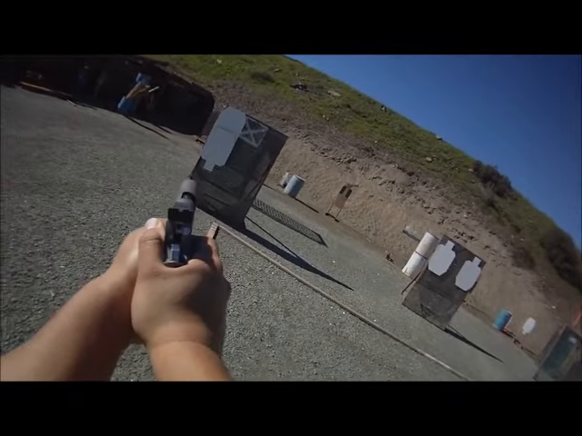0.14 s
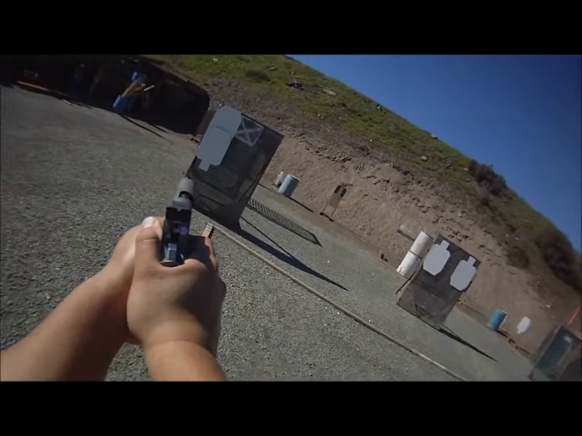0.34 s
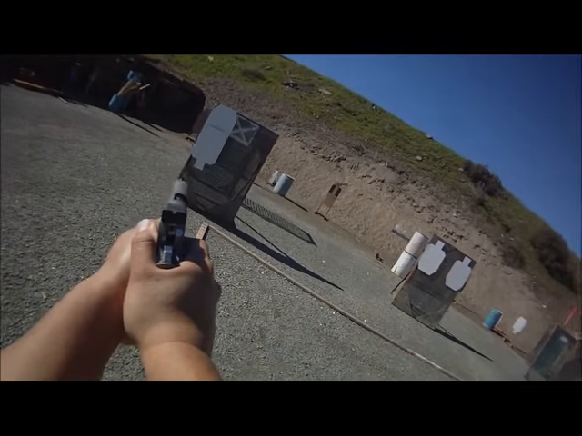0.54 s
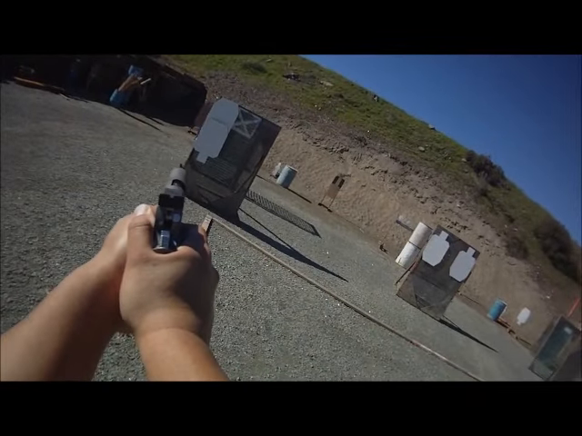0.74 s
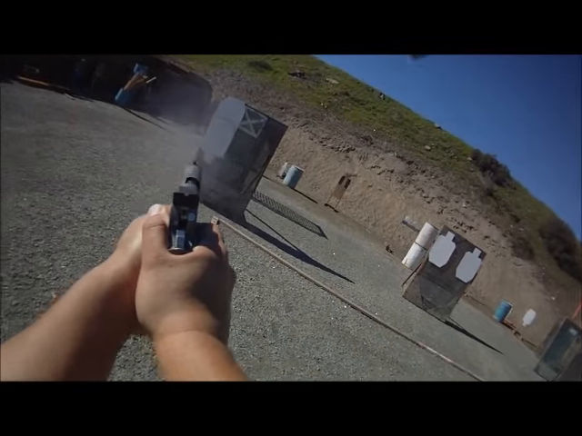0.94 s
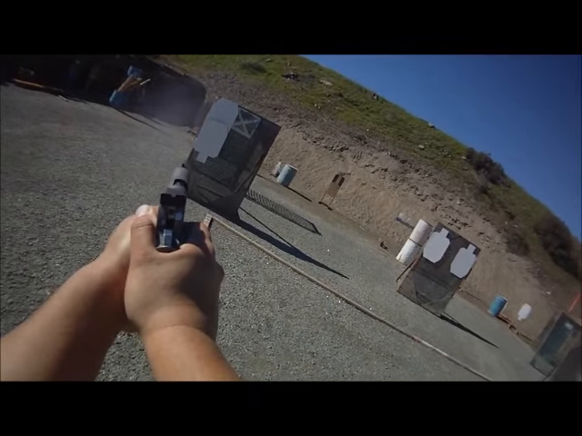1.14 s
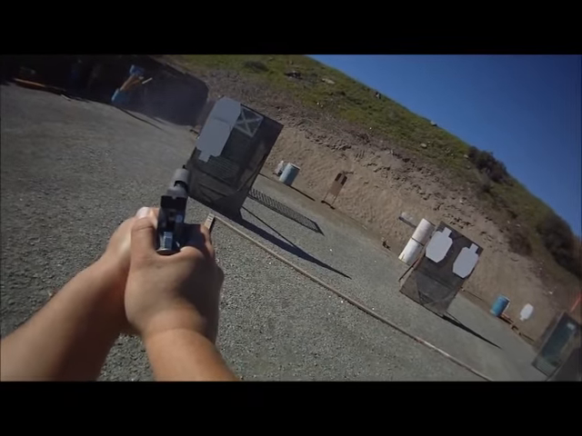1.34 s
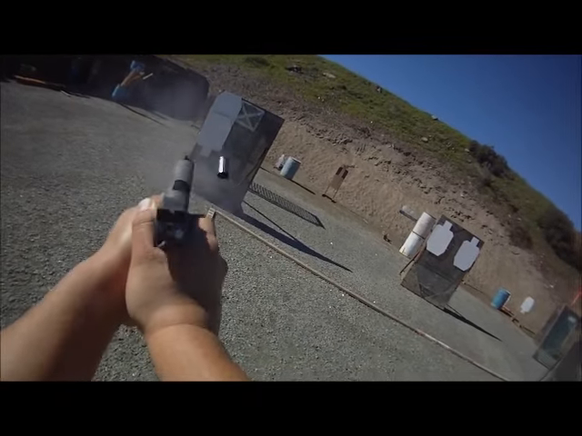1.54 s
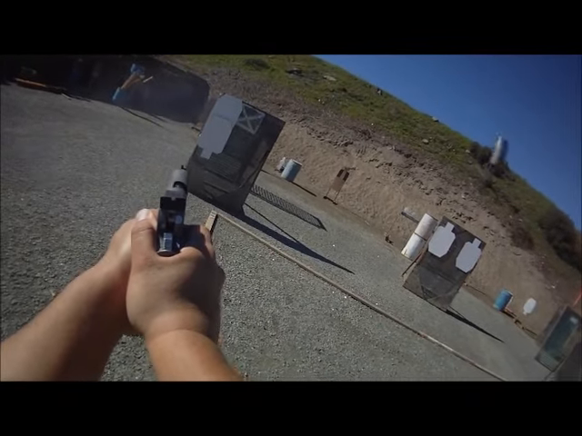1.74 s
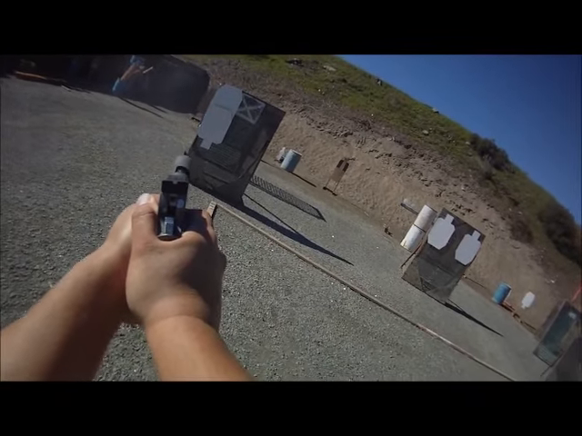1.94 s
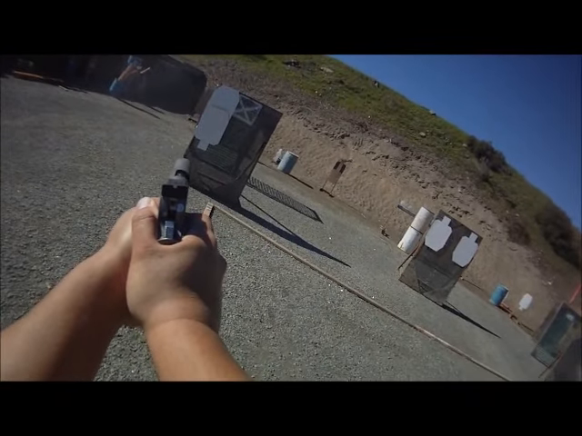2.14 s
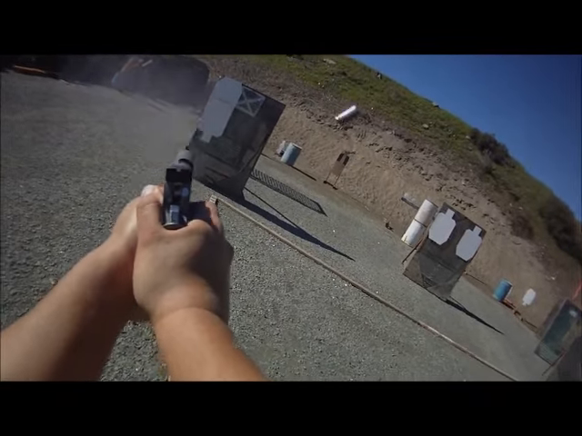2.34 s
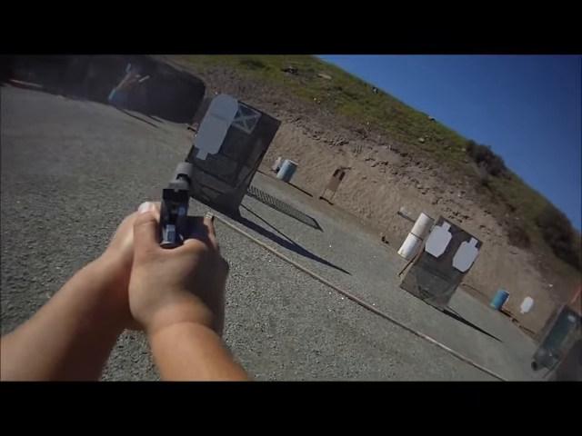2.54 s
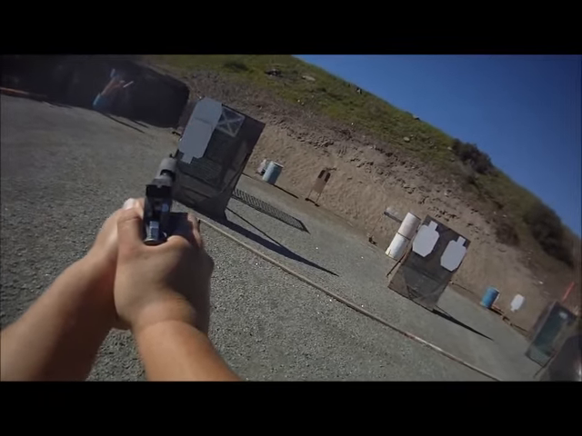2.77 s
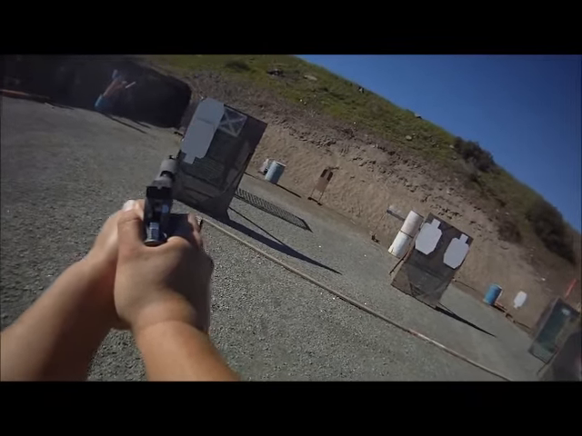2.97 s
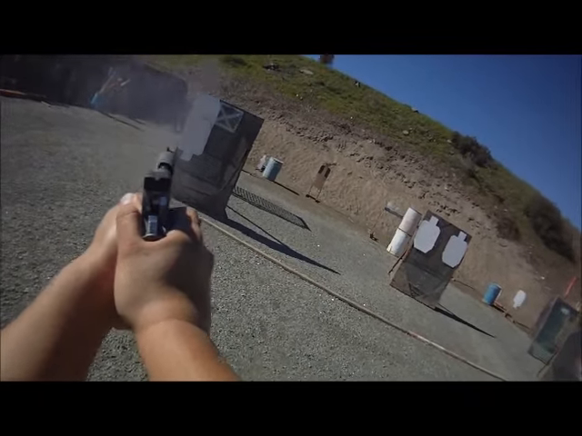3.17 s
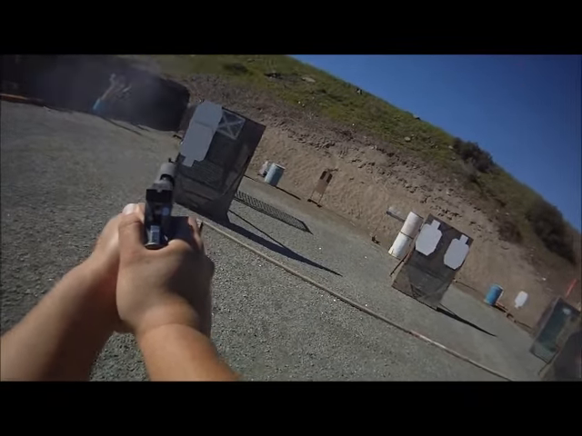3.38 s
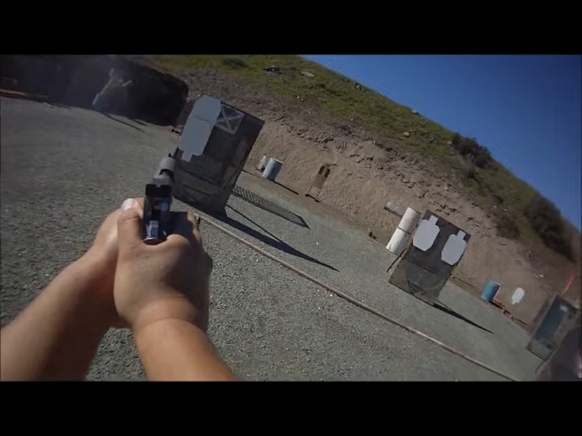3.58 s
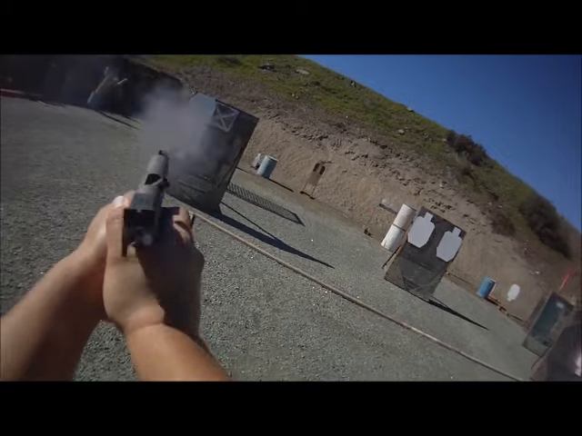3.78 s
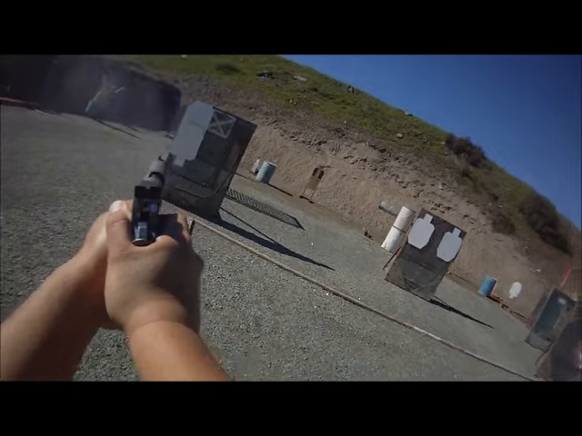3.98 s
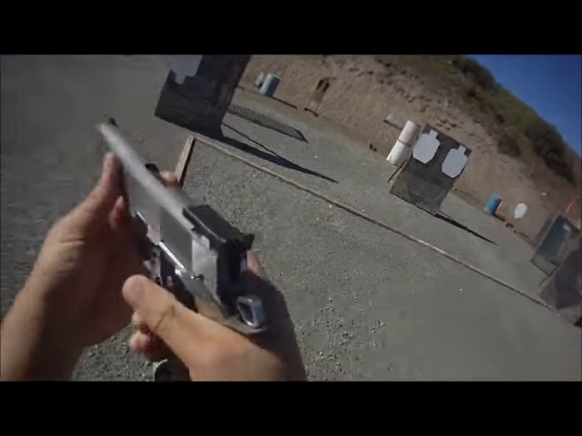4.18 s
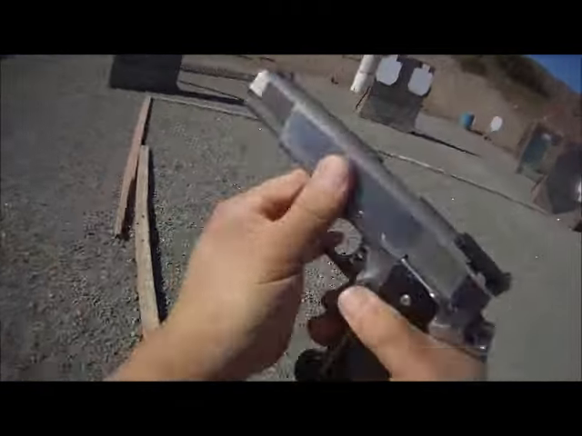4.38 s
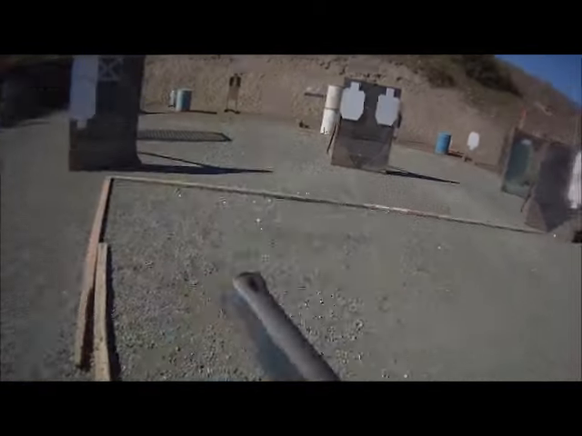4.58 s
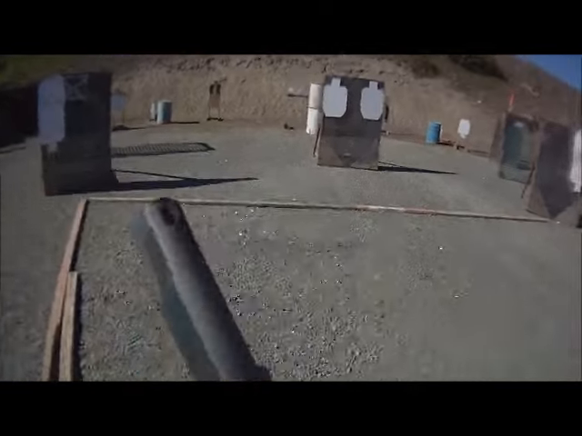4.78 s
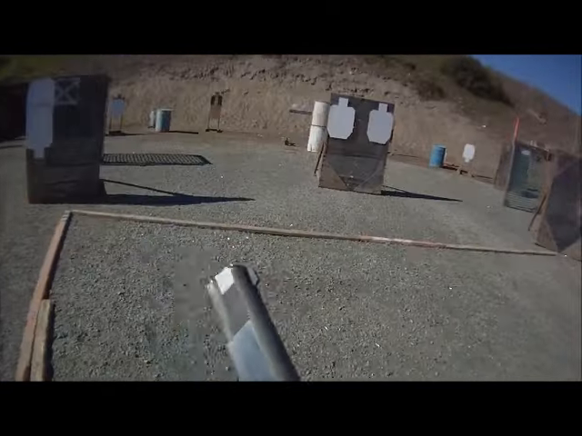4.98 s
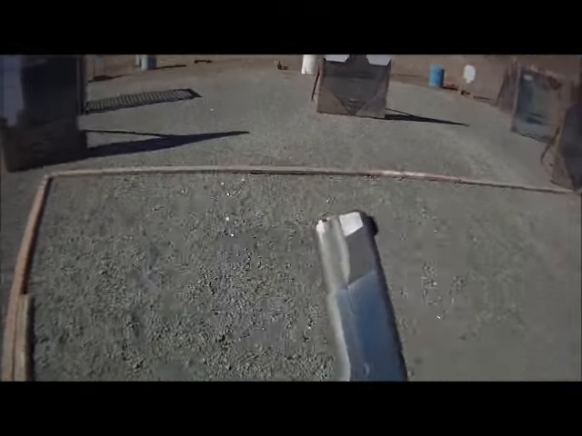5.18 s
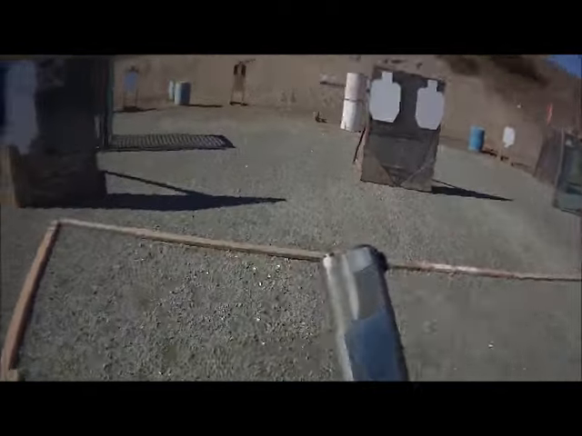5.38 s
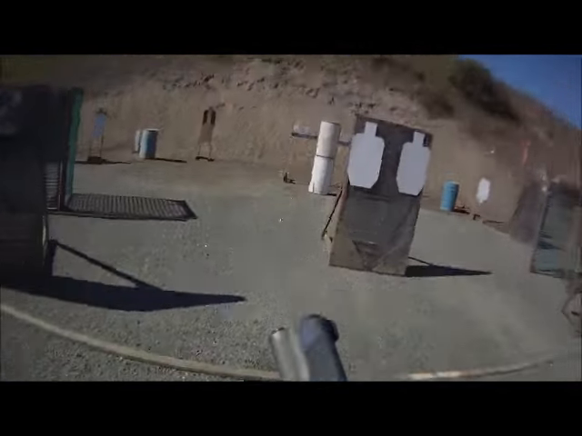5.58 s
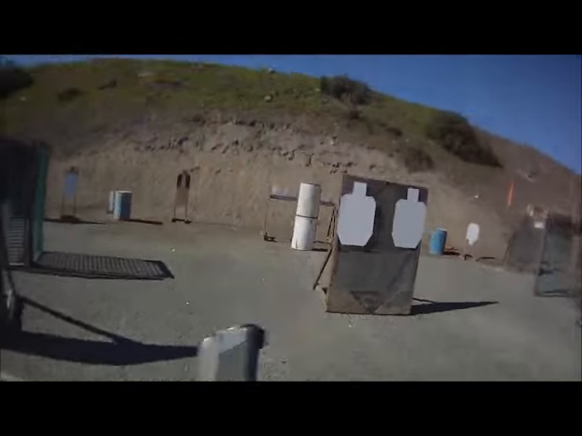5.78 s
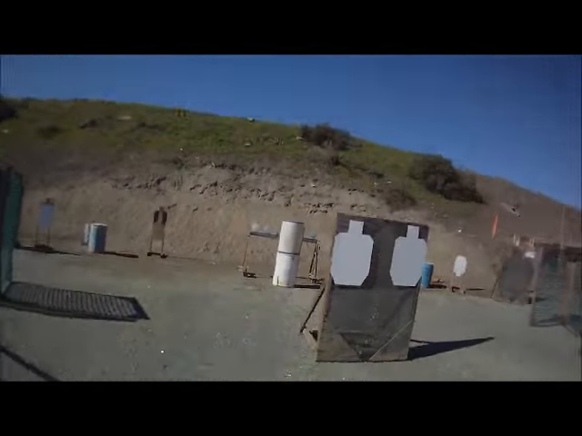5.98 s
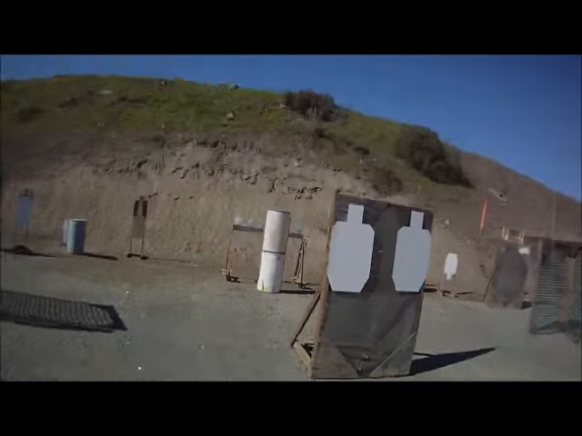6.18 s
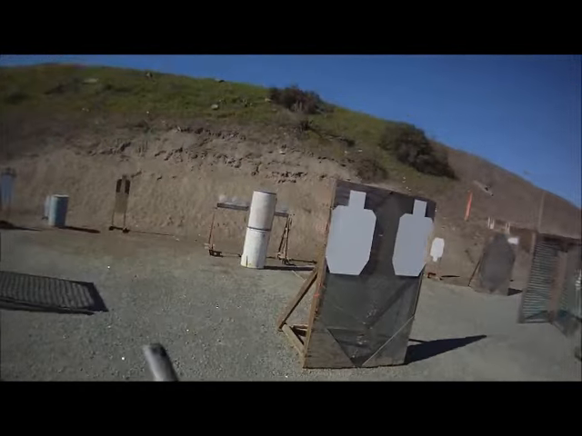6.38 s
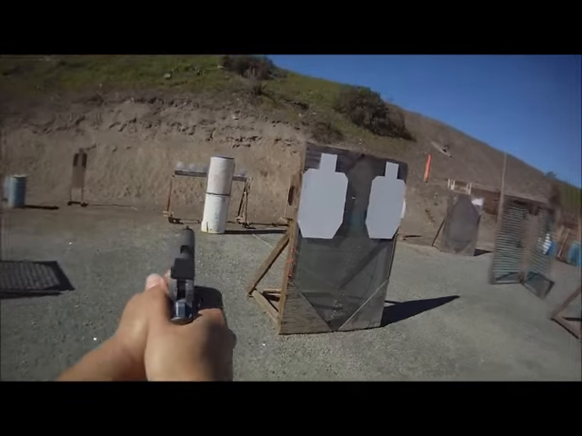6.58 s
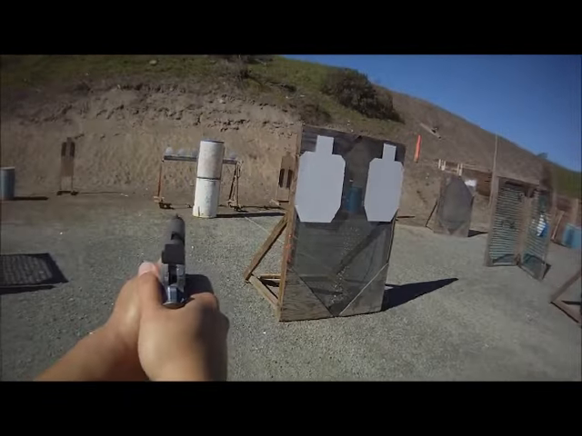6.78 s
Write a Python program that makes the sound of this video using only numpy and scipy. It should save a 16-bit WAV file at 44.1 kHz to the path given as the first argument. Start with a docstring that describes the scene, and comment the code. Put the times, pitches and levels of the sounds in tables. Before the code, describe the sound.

Five evenly spaced pistol shots crack and clip in a gravel bay with slapping echoes, then a clattering reload and hurried gravelly movement.

```python
"""Pistol and reload in a gravel bay

Place: a gravel bay between earth banks; five pistol shots, then a reload on the move, a far gun thudding.
Microphone: head-worn, in the small housing of a camera that rings with every push and clips on the blasts.
Each shot is a noise burst plus the same string of echoes from boards and banks and a scattered tail.
Knocks of magazine, gear and mount are short noise pushes; clothes and feet are noise that swells and jolts.
"""
import sys
import numpy as np
from scipy import signal
from scipy.fft import rfft, irfft
from scipy.io import wavfile
from scipy.ndimage import uniform_filter1d

SR = 44100
rng = np.random.default_rng(int(sys.argv[2]) if len(sys.argv) > 2 else 0)


def generate_wav(signal):
    """Clip the signal to [-1, 1] and save it as 16-bit WAV at the path in sys.argv[1]."""
    frames = np.transpose(np.atleast_2d(signal))
    scaled = np.clip(frames, -1, 1) * 32767
    pcm = np.round(scaled).astype(np.int16)
    wavfile.write(sys.argv[1], SR, pcm)


N = 300762
T = np.arange(N) / SR  # time [s]


def undb(db):
    """Level in dB to amplitude."""
    return 10 ** (np.asarray(db) / 20)


def unit(x):
    """Scale to an rms of 1."""
    return x / np.sqrt(np.mean(x ** 2))


def peak(x):
    """Scale each row to a peak of 1."""
    return x / np.abs(x).max(axis=-1, keepdims=True)


def band(x, lo_hz, hi_hz):
    """Band-pass, scaled to an rms of 1."""
    return unit(signal.sosfilt(signal.butter(2, (lo_hz, hi_hz), "band", fs=SR, output="sos"), x))


def walk(rate, size):
    """Random level that slides to a new value every 1 / rate seconds; spread near 1.4."""
    hold = int(SR / rate)
    steps = np.repeat(rng.standard_normal(size // hold + 1), hold)
    return 1.68 * uniform_filter1d(steps, hold)[:size]


LOW_CUT_HZ = 241


def response(modes, rise_ms):
    """Sum of decaying resonances with a soft start; white noise through it keeps its rms."""
    t = T[:1024]
    h = sum(undb(db) * np.sqrt(width) * np.exp(-np.pi * width * t) * np.sin(2 * np.pi * hz * t)
            for hz, width, db in modes)
    h = h * (1 - np.exp(-1000 * t / rise_ms))
    h = signal.sosfilt(signal.butter(4, LOW_CUT_HZ, "high", fs=SR, output="sos"), h)
    # steep fall above the last resonance listed
    high_cut_hz = min(1.5 * modes[-1][0], .45 * SR)
    h = signal.sosfilt(signal.butter(4, high_cut_hz, fs=SR, output="sos"), h)
    return h / np.sqrt(np.sum(h ** 2))


# Resonances of the microphone housing in four bands: (frequency [Hz], width [Hz], level [dB])
BOOM_MODES = [(283, 170, -8.5), (460, 210, -1.5), (565.6, 201, 14), (720, 130, -1)]
CRACK_MODES = [(1700, 600, -4), (2447, 500, 3), (2920, 695, 11.5), (3770, 180, -5.5)]
SIZZLE_MODES = [(6040, 2200, 7), (6630, 2100, 1.5)]
TOP_MODES = [(10300, 4700, 0), (13800, 20000, -1)]
RISE_MS = (0.29, 0.097, 0.097, 0.011)  # boom, crack, sizzle, top


def ring(tracks):
    """Boom, crack, sizzle and top pressure ring the camera housing around the microphone."""
    bands = (BOOM_MODES, CRACK_MODES, SIZZLE_MODES, TOP_MODES)
    body = [response(modes, rise_ms) for modes, rise_ms in zip(bands, RISE_MS)]
    body = np.reshape(body, (4,) + (1,) * (tracks.ndim - 2) + (-1,))
    return signal.fftconvolve(tracks, body, axes=-1)[..., :tracks.shape[-1]]


TOP_DB, SOFTNESS = -7.5, .3  # top against sizzle [dB]; dB lost for each dB that sizzle lies under crack


def with_top(db):
    """Soft contacts are duller: the top level follows from boom, crack, sizzle levels."""
    return np.array([*db, db[2] + TOP_DB + SOFTNESS * np.minimum(db[2] - db[1], 0)])


PART_WIDTH_HZ, PART_DB = 270, -2.5


def knocks(rows, grain, size, part_hz=None):
    """Rough decaying pushes ring the housing; each struck part may add its own short ring.

    Rows: (time [s], boom, crack, sizzle peak [dB], spread [ms]); grain: (4, rows, samples).
    """
    rows = np.array(rows)
    length = grain.shape[-1]
    push = grain * np.exp(-1000 * T[:length] / np.maximum(rows[:, 4:], .1))
    rung = peak(ring(push))
    if part_hz is not None:
        t = T[:512]
        cycles = part_hz[:, None] * t
        part = np.minimum(cycles, 1) ** 2 * np.exp(-np.pi * PART_WIDTH_HZ * t) * np.sin(2 * np.pi * cycles)
        part_ring = peak(signal.fftconvolve(push[1], part, axes=-1)[:, :length])
        rung[1] = peak(rung[1] + undb(PART_DB) * part_ring)  # joins the crack band
    gain = undb(with_top(rows[:, 1:4].T))
    out = np.zeros(size + length)
    for s, knock in zip(rows[:, 0], np.sum(rung * gain[..., None], axis=0)):
        start = int(s * SR)
        out[start:start + length] += knock
    return out[:size]


# Spectrum of the open air and circuit hiss: (frequency [Hz], density [dB per Hz, relative])
AIR_SPECTRUM = [(25, -11.5), (60, 0), (85, -14.5), (230, -16), (430, -9), (600, -3), (950, -16.5),
                (2500, -18.5), (3800, -29.5), (14800, -29.5), (16000, -38)]
AIR_DB = -62


def air():
    """Background all around: outdoor air and circuit hiss, shaped noise that gently wavers."""
    hz, db = np.transpose(AIR_SPECTRUM)
    gain = undb(np.interp(np.log(np.fft.rfftfreq(N, 1 / SR) + 1), np.log(hz), db))
    hiss = unit(irfft(rfft(rng.standard_normal(N)) * gain, N))
    return hiss * undb(AIR_DB + walk(15, N))


FAR_GUN_S = 2.851, 3.160
FAR_GUN_DB, FAR_GUN_HZ = -16, 631
FAR_ECHO_DB, FAR_ECHO_T60_S = -27.5, 0.56  # echo level against the thud


def far_gun():
    """Far off, in another bay: dull decaying tones with noisy echoes trailing."""
    out = 0
    for s in FAR_GUN_S:
        t = np.maximum(T - s, 0)
        fade = np.minimum(t / 0.027, 1) * 1000. ** (-t / FAR_ECHO_T60_S)
        trail = fade * undb(FAR_ECHO_DB + 2.5 * walk(80, N)) * rng.standard_normal(N)
        low_trail = band(trail, 350., 900.) * np.std(trail)
        high_trail = undb(-12.0) * band(trail, 1200., 3500.) * np.std(trail)
        thud = np.sin(2 * np.pi * FAR_GUN_HZ * t) * np.exp(-t / 0.0021) * np.minimum(t / 0.002, 1)
        out = out + thud + low_trail + high_trail
    return undb(FAR_GUN_DB) * out


# The shooter moves, close to the microphone: (time [s], rustle level [dB], low jolt level [dB])
MOVING_LEVELS = [(0, -78, -77), (.1, -57.5, -80), (.2, -72, -80), (.5, -93, -90.5), (4.1, -92, -90.5),
                 (4.2, -58, -55), (4.45, -51.5, -55.5), (4.58, -60, -61), (4.83, -45, -53),
                 (4.91, -39, -78), (5.02, -48.5, -49.5), (5.21, -46.5, -52), (5.33, -56.5, -48),
                 (5.44, -48.5, -49), (5.56, -61.5, -63), (5.7, -43.5, -40.5), (5.8, -65, -44.5),
                 (5.99, -42, -41.5), (6.13, -62, -44.5), (6.35, -46, -44.5), (6.47, -60, -67.5),
                 (6.54, -56, -52), (6.62, -61.5, -67), (6.76, -56, -51), (6.82, -67, -57)]
RUSTLE_SIZZLE_DB, RUSTLE_BOOM_DB = -14, 0.5
JOLT_SHARE = 0.54  # the boom follows both rustle and jolts
CLOTH_LOW_HZ, CLOTH_HIGH_HZ, CLOTH_DB = 970, 1700, -3  # level against the boom


def rustle():
    """Feet and clothes at the body: dense noise grains of uneven size; steps rumble through the mount."""
    s, *columns = np.transpose(MOVING_LEVELS)
    crack_db, jolt_db = (np.interp(T, s, column) for column in columns)
    boom_db = RUSTLE_BOOM_DB + crack_db + JOLT_SHARE * (jolt_db - crack_db)
    sizzle_db = crack_db + RUSTLE_SIZZLE_DB
    grain = undb([1.0 * walk(350, N) + 3.5 * walk(30, N) for _ in range(4)])
    # now and then a stone cracks and stands out in all bands
    stones = np.repeat(rng.exponential(size=N // 40 + 1), 40)[:N]
    grain = grain * undb(2.5 * stones - 5.0)
    noise = rng.standard_normal((6, N))
    # clothes fill the gap between boom and crack
    cloth = band(noise[5], CLOTH_LOW_HZ, CLOTH_HIGH_HZ) * undb(boom_db + CLOTH_DB) * grain[0]
    steps = band(noise[4], 55.0, 290.0) * undb(jolt_db + 3 * walk(20, N))
    gain = undb(with_top(np.array([boom_db, crack_db, sizzle_db])))
    return ring(gain * grain * noise[:4]).sum(axis=0) + steps + cloth


# Thin steel and brass rings, and one low thump of the mount:
# (time [s], frequency [Hz], level [dB], decay by 60 dB [s])
PING_TONES = [(5.013, 142, -26.5, 0.071), (5.958, 6700, -34, 0.1), (6.715, 7970, -46.5, 0.063)]


def pings():
    """Lone tones that waver in level and die away."""
    t = T[:SR // 4]
    out = np.zeros(N + len(t))
    for s, hz, db, t60 in PING_TONES:
        start = int(s * SR)
        out[start:start + len(t)] += undb(db) * np.sin(2 * np.pi * hz * t) * 1000. ** (-t / t60)
    return out[:N] * undb(4.6 * walk(90, N))


# Spent cases, gun, magazine, gear and mount knock:
# (time [s], crack [dB], boom [dB], sizzle [dB], spread [ms], ring of the struck part [Hz])
HANDLING_KNOCKS = [(0.03, -54, -42, -75, 2.4, 1250), (.074, -42, -59, -65, 1.8, 2320),
                   (.0907, -45, -47, -68, 1.9, 2730), (.113, -38, -65, -73, 1.7, 2390),
                   (.179, -48, -43.5, -73, 2.5, 2400), (.192, -44, -45, -72, 2, 1570),
                   (0.611, -49, -54, -69, 2.4, 1560), (1.3718, -30, -56, -30, 1.2, 3440),
                   (1.99, -28.5, -37, -30, 1.04, 3350), (2.617, -31, -29, -32, 1.5, 2840),
                   (3.462, -34, -27, -28.5, 1.9, 3620), (4.1305, -35, -42, -28, 1.7, 2900),
                   (4.2684, -10, -17.5, -23.5, 2.3, 2600), (4.3005, -10, -44, -14, 0.49, 3780),
                   (4.3098, -15, -32, -13.5, 0.56, 3300), (4.3149, -14, -25, -39, 1.4, 2600),
                   (4.3459, -13.5, -26, -31, 0.46, 1690), (4.3633, -16.5, -24, -31, 1.2, 2600),
                   (4.404, -5, -16, -16.5, 0.32, 2470), (4.4224, -23.5, -45, -41, .94, 2820),
                   (4.4657, -17.5, -23, -41, 1, 2730), (4.5298, -24, -26.5, -40, 1.2, 2720),
                   (4.5436, -19, -31.5, -40, 1.7, 2630), (4.601, -25, -41, -32.5, 2.3, 2500),
                   (4.6596, -18, -51, -19.5, 3.9, 2470), (4.6917, -18, -24, -40, 1.7, 2700),
                   (4.7024, -28.5, -23.5, -41, 1.8, 1640), (4.7467, -14, -32, -14, 0.62, 3720),
                   (4.754, -13, -29, -14, 0.42, 3300), (4.7588, -16, -46, -35, 2.6, 3120),
                   (4.7659, -15, -48, -14.5, 0.8, 3740), (4.7778, -23, -23.5, -46, 1.4, 2500),
                   (4.8276, -17, -23, -28, 4, 1540), (4.9, -26, -46, -39, 2.1, 3410),
                   (4.911, -20.5, -54, -45, 0.83, 1730), (4.9761, -6, -16, -19, 0.38, 2460),
                   (5.0437, -17.5, -25, -38, 0.56, 2800), (5.0581, -23.5, -20.5, -38, 2.5, 1140),
                   (5.109, -26, -37, -21, 10.5, 3020), (5.118, -20, -48, -28, 1.5, 3860),
                   (5.2298, -20, -31, -40, 1.2, 2680), (5.3077, -27.5, -51, -43, .77, 2700),
                   (5.3735, -29.5, -34, -35, 12, 2580), (5.3885, -15.5, -31, -19, 1, 3300),
                   (5.3992, -17, -49, -22, 1, 3560), (5.4837, -5.5, -11, -12.5, 0.69, 2590),
                   (5.5807, -31, -49, -30.5, 1.46, 2534), (5.6176, -18.5, -30, -32, 0.72, 2770),
                   (5.6743, -5.5, -10, -17.5, 0.17, 2580), (5.6822, -14, -15, -21, 2.7, 2630),
                   (5.6955, -8.5, -39, -30, 2.1, 3480), (5.701, -7, -23, -14.5, 1, 2850),
                   (5.719, -17, -17, -33, 2.4, 2800), (5.7284, -6.5, -9, -5.5, 0.87, 2330),
                   (5.7313, -3.5, -5, -11.5, 1.34, 3130), (5.7629, -16.5, -16, -37, 1.9, 2300),
                   (5.7823, -15, -13.5, -35, 1.2, 2840), (5.7939, -13.5, -23, -24.5, 1.2, 2800),
                   (5.8947, -10.5, -45, -9, 0.7, 3790), (5.9068, -10, -41, -16, 1.1, 3840),
                   (5.9178, -15, -16, -19, 4.4, 2420), (5.9234, -8, -37, -19, 0.26, 3050),
                   (5.9374, -1, -18, -5.5, 2, 2490), (5.9458, -8, -16, -9.5, 2.2, 2770),
                   (5.9562, -12.5, -42, -16, 2, 2050), (5.9778, -4.5, -10.5, -2.5, 0.48, 2660),
                   (6.0058, -14, -23.5, -47, 2.5, 1620), (6.0238, -11.5, -30, -19, 0.5, 2840),
                   (6.0655, -24.5, -44, -45, 0.85, 2680), (6.0953, -23, -28, -42, 11.6, 1170),
                   (6.1034, -9, -23, -15, 0.84, 2580), (6.1144, -22, -24, -31, 1, 1640),
                   (6.1643, -26.5, -28, -45, 2, 2170), (6.2003, -31.5, -24, -59, 3.1, 2300),
                   (6.2264, -15, -23, -21, 0.21, 2800), (6.299, -12.5, -36, -23, 0.54, 2810),
                   (6.3208, -19, -15, -41, 0.6, 2790), (6.328, -12.5, -16.5, -35, 1.1, 3000),
                   (6.3363, -4, -13.5, -11.5, 0.68, 2410), (6.372, -2, -15, -9.5, 1.1, 2630),
                   (6.4528, -31.5, -51, -62, 0.14, 2720), (6.5368, -20.5, -24.5, -43, 1.4, 2230),
                   (6.6004, -37, -34, -60, 1.5, 2350), (6.688, -29, -29.5, -58, 3.7, 2570),
                   (6.6925, -25.5, -33, -51, 0.54, 2620), (6.782, -22, -30.5, -40, 0.31, 2680),
                   (6.803, -34, -36, -57, 2.6, 1170)]


def clacks():
    """Handling and reload: every knock rings the struck part and the same housing."""
    rows = np.array(HANDLING_KNOCKS)
    grain = np.moveaxis(rng.standard_normal((len(rows), 4, 2200)), 0, 1)
    boom_first = rows[:, [0, 2, 1, 3, 4]]
    return knocks(boom_first, grain, N, rows[:, 5])


SAME_AIR = .92, 0.61, .2, 0.07  # share of boom, crack, sizzle and top that repeats from shot to shot


def reshuffle(bay):
    """Moving air changes the fine grain of an echo pattern, most in the treble."""
    same = np.reshape(np.clip(SAME_AIR, 0, 1), (4,) + (1,) * (bay.ndim - 1))
    return same * bay + np.sqrt(1 - same ** 2) * rng.standard_normal(bay.shape)


GROUND_S, GROUND_DB = 0.0094, -14  # delay of the peak
BANKS_S, BANKS_DB, BUILD_DB_PER_S, FALL_DB_PER_S = 0.08, -16.5, 108.5, 119.5
LATE_DB, LATE_FALL_DB_PER_S = -64.5, 46.5  # slow tail: its level at the delay of the hill
HILL_S, HILL_FADE_S, HILL_DB = .532, 0.023, -57.5


def scatter_db(t):
    """Scattered blast against delay: near ground at once, banks building and falling, a far slope once."""
    onset = np.minimum(t / GROUND_S, 1) ** 2
    near = undb(GROUND_DB) * (t / GROUND_S * np.exp(1 - t / GROUND_S)) ** 2
    banks_slope_db = np.minimum(BUILD_DB_PER_S * (t - BANKS_S), FALL_DB_PER_S * (BANKS_S - t))
    banks = undb(BANKS_DB + banks_slope_db) * onset
    rest = undb(LATE_DB - LATE_FALL_DB_PER_S * (t - HILL_S)) * onset
    hill = undb(HILL_DB) * np.exp(-np.abs(t - HILL_S) / HILL_FADE_S) * (t > HILL_S)
    return 10 * np.log10(near ** 2 + banks ** 2 + rest ** 2 + hill ** 2 + 1e-10)


# Pistol shots: (time [s], charge level [dB])
SHOT_TIMES = [(0.9418, -0.5), (1.6431, -0.5), (2.3825, -0.5), (3.19, -1), (3.9085, 0.)]
# Single reflectors, boards and banks: (delay [s], boom peak [dB], crack peak [dB], sizzle peak [dB])
REFLECTORS = [(.0079, -4, 1.5, -6), (0.0102, -5.5, -8, -16), (0.0332, -6, 1.5, -8.5),
              (.035, -7.5, -3.5, -9.5), (.037, -7, -4, -12), (0.0449, -13, -6.5, -20),
              (.055, -6, -7.5, -24.5), (.0595, -8.5, -23, -17), (.064, -2, -22.5, -11),
              (0.0663, -19, -1.5, -6.5), (0.0711, -8.5, 12, -23), (.0756, -19.5, -7.5, -8),
              (.0853, -8.5, -2, -25), (0.0903, -17, 2, -10.5), (.0998, -4, -2, -10),
              (.1082, -20, -14.5, -17), (0.1155, -9.5, -27, -47), (.126, -18.5, -20, -24),
              (0.1468, -14.5, -31, -49), (0.1611, -23, -4.5, -23), (.2523, -21, -22, -78),
              (.531, -42, -38, -60)]
# Scatter of boom, crack, sizzle, top against the common level: (level [dB], tilt [dB per s of travel])
SCATTER_TILTS = [(-3, 14.5), (0, -0.5), (-11.5, -31), (-12, -69.5)]
# Bands that fill in late, against the common scatter level:
# (low edge [Hz], high edge [Hz], level [dB], tilt [dB per s of travel], build-up [s])
LATE_BANDS = [(159, 380, -11.5, 29.5, 0.1), (1060, 2900, -13, 25, 0.033), (3440, 4100, -13.5, 7, 0.023)]
BLAST_MS, BLAST_DB = 3.7, (-1.5, 9, -3.5, -1)  # boom, crack, sizzle, top
SHOVE_DB, SHOVE_MS = -13, 7.9
SMEAR_MS, SMEAR_MS_PER_S = 0.56, 4.6  # far echoes arrive more smeared


def shots():
    """At arm's length: blast, single echoes and scatter; the bay answers every shot alike."""
    size = int(.95 * SR)
    t = T[:size]
    back_db = scatter_db(t)
    tilt_db = np.array([db + slope * t + 1.5 * walk(250, size) for db, slope in SCATTER_TILTS])
    scatter = undb(back_db + tilt_db)
    late = 0
    for lo, hi, db, slope, build_s in LATE_BANDS:
        level = undb(back_db + db + slope * t) * np.minimum(t / build_s, 1) ** 2
        late = late + band(rng.standard_normal(size), lo, hi) * level
    echoes = [(*echo, SMEAR_MS + SMEAR_MS_PER_S * echo[0]) for echo in REFLECTORS]
    ground = rng.standard_normal((4, size))
    boards = rng.standard_normal((4, len(echoes), 1200))
    # the blast shoves the membrane aside: it stalls after a few ms and creeps back
    shove_time = 1000 * t / SHOVE_MS
    shove = undb(SHOVE_DB) * shove_time * np.exp(1 - shove_time)
    out = np.zeros(N)
    for s, db in SHOT_TIMES:
        grain = reshuffle(ground)
        blast = ring(undb(BLAST_DB)[:, None] * grain[:, :400]).sum(axis=0)
        blast = blast * (1000 * t[:400] < BLAST_MS)
        tail = ring(scatter * grain).sum(axis=0) + late
        shot = tail + knocks(echoes, reshuffle(boards), size) + shove
        shot[:len(blast)] += blast
        start = int(s * SR)
        out[start:start + size] += undb(db) * shot
    return out


def scene():
    """One microphone feeds both channels."""
    mono = shots() + clacks() + far_gun() + pings() + rustle() + air()
    return np.tile(mono, (2, 1))


CLIP, COUPLING_HZ, TOP_HZ = 0.73, 90., 15300  # clip level in amplitude


def record(dry):
    """Microphone chain: peaks clip, the coupling drains the deep bass and the top is cut."""
    x = np.clip(dry, -CLIP, CLIP)
    x = signal.sosfilt(signal.butter(1, COUPLING_HZ, "high", fs=SR, output="sos"), x)
    x = signal.sosfilt(signal.ellip(7, .2, 55, TOP_HZ, fs=SR, output="sos"), x)
    return np.clip(x, -1, 1)


dry = scene()
out = record(dry)
generate_wav(out)
```